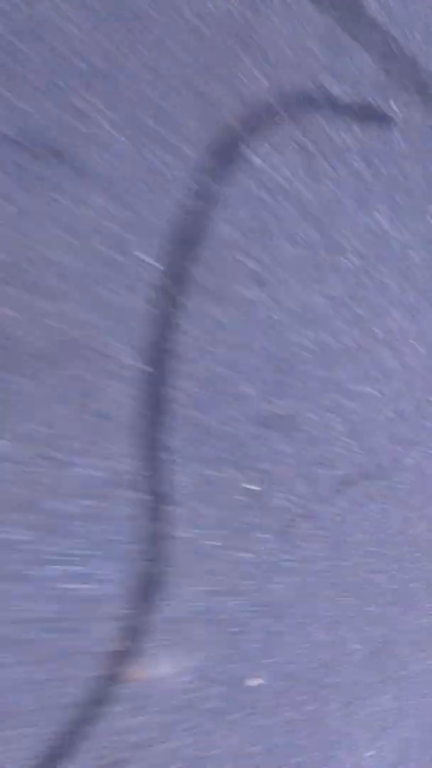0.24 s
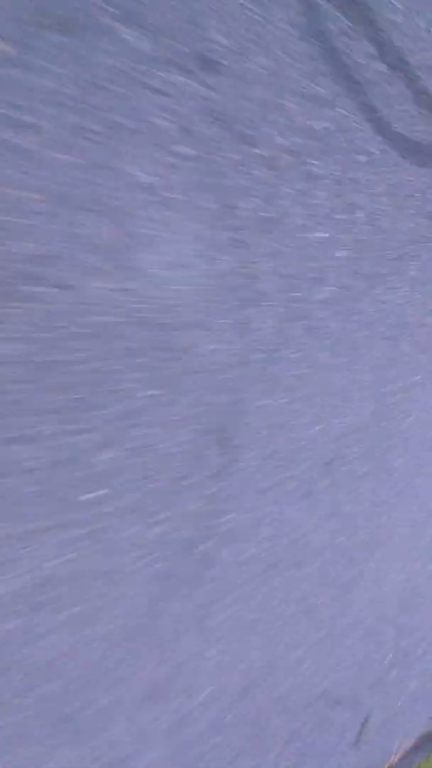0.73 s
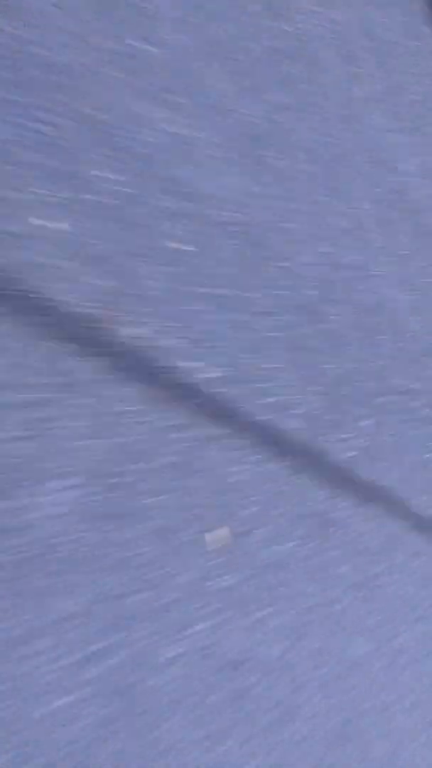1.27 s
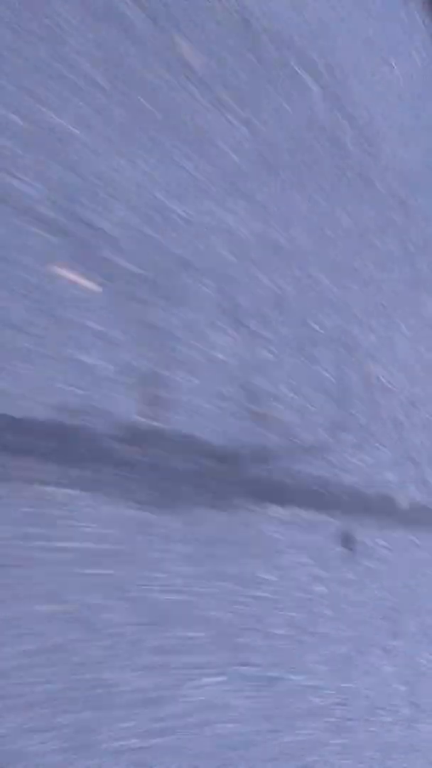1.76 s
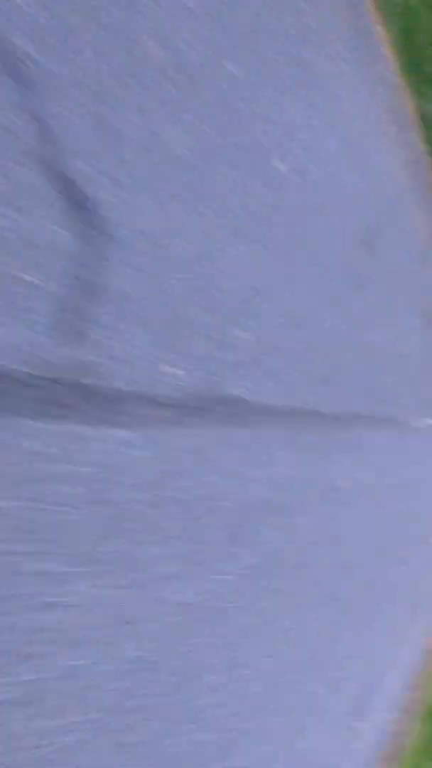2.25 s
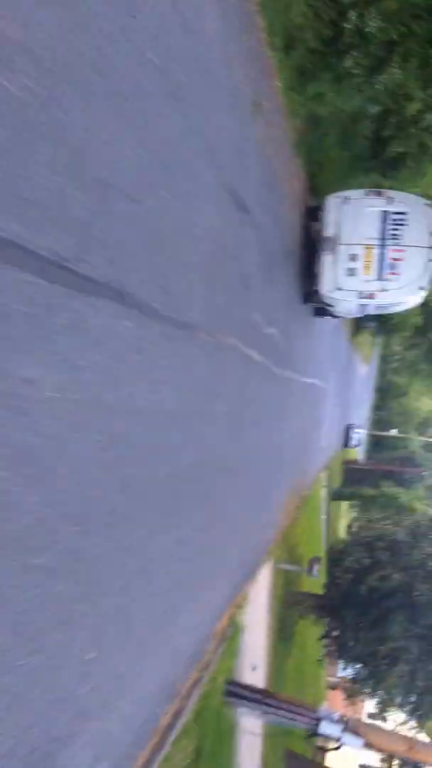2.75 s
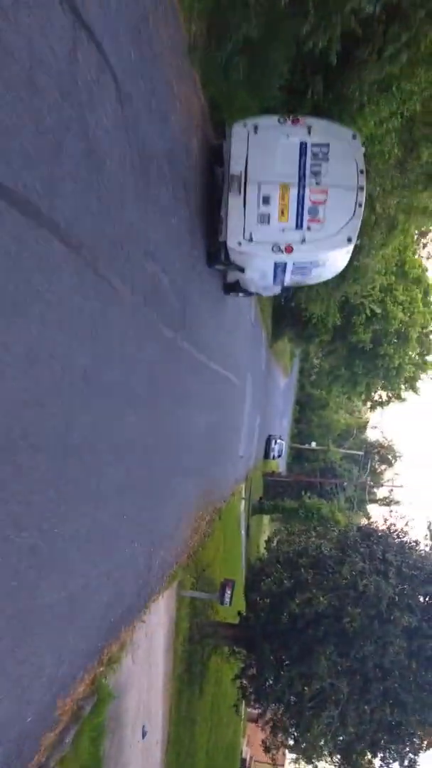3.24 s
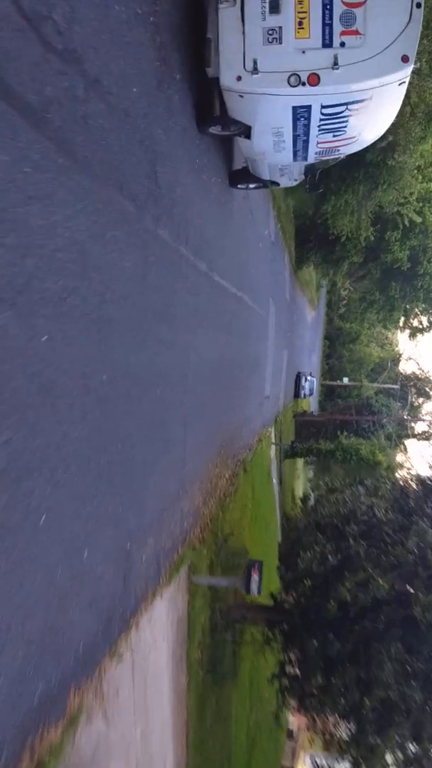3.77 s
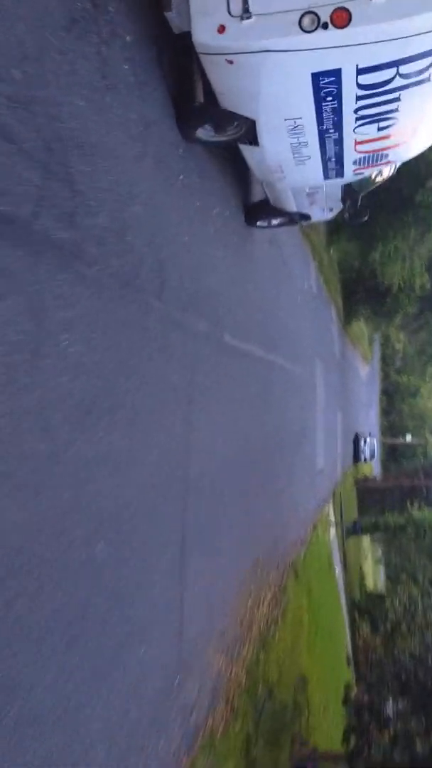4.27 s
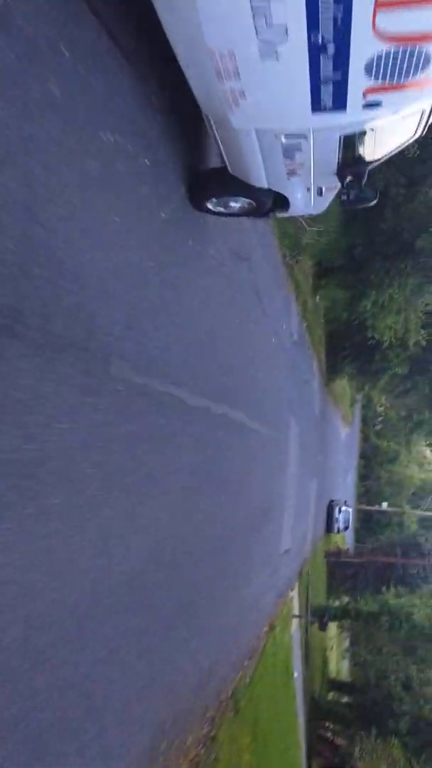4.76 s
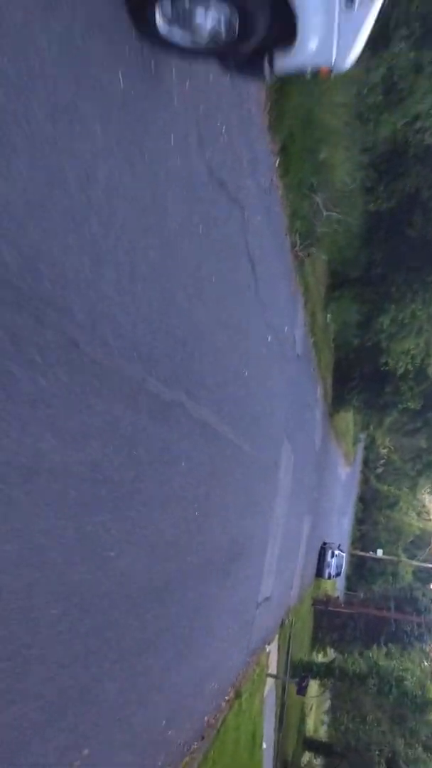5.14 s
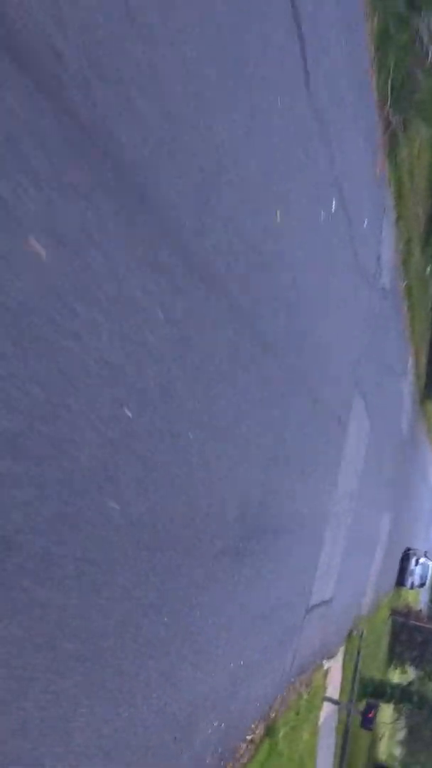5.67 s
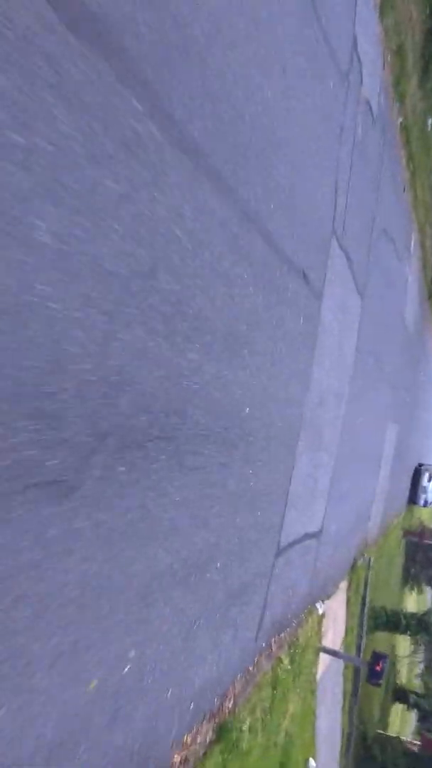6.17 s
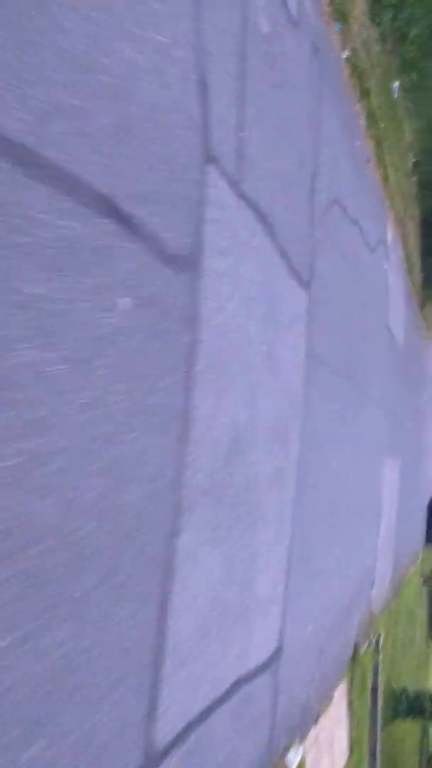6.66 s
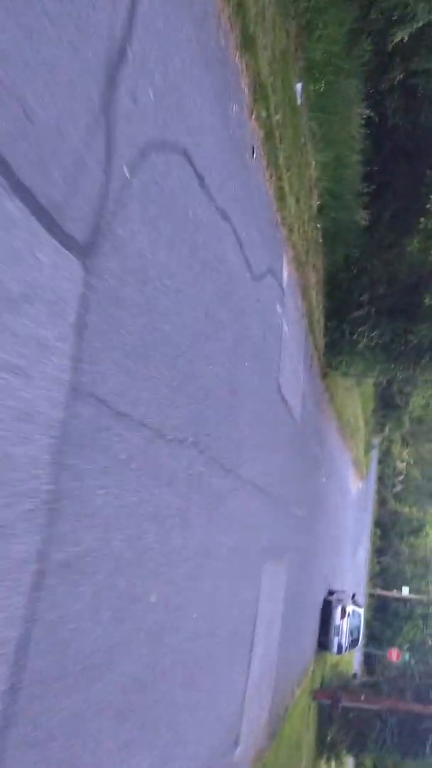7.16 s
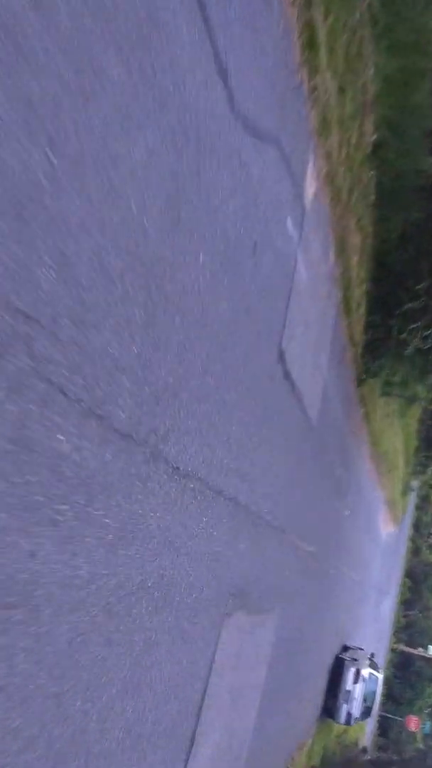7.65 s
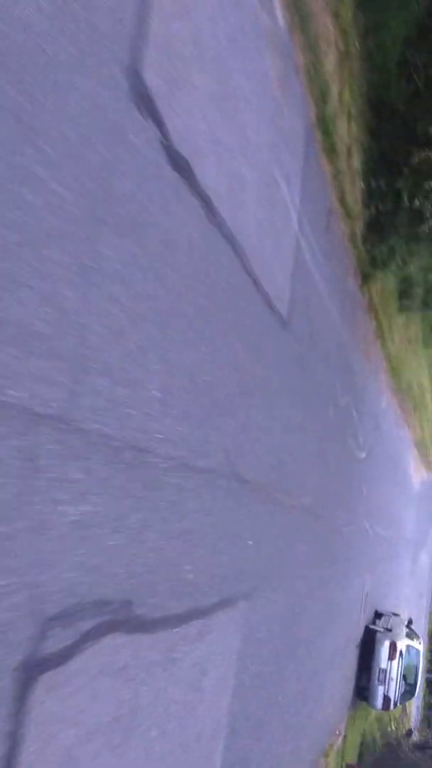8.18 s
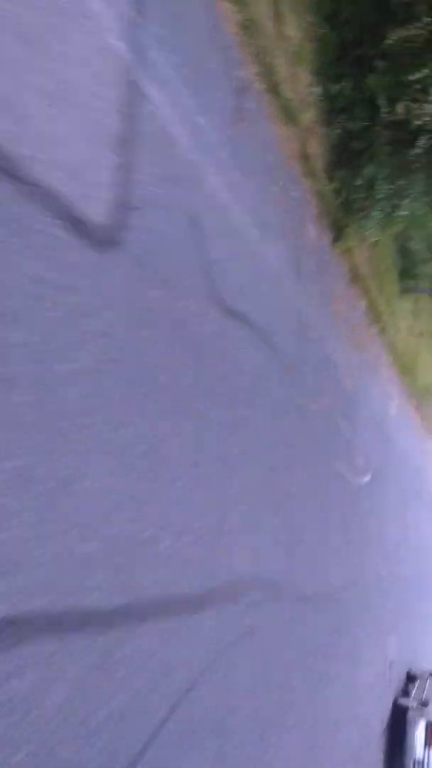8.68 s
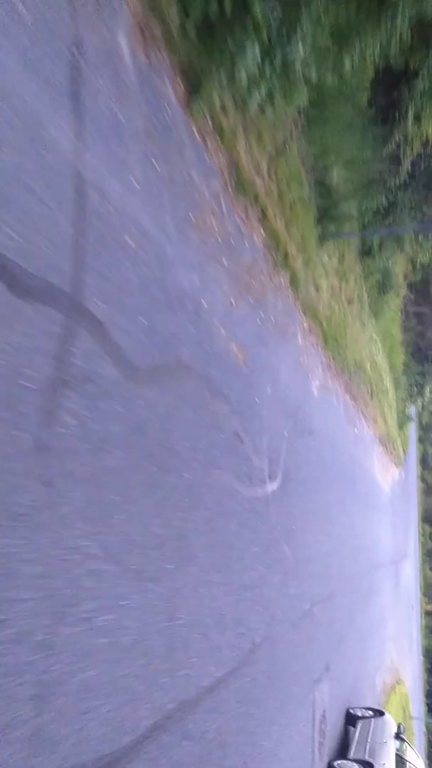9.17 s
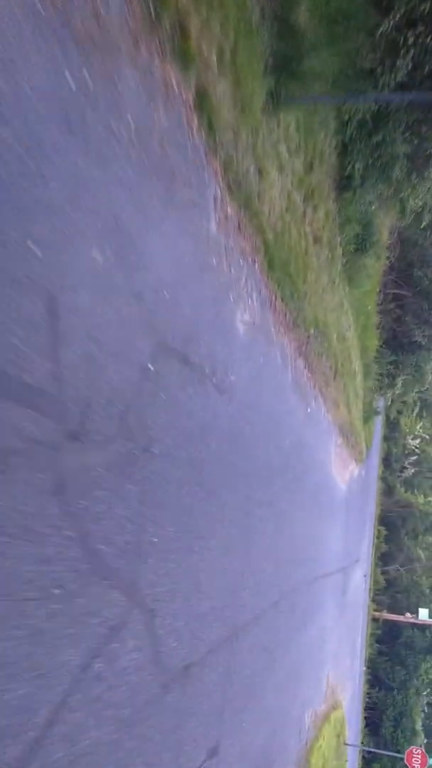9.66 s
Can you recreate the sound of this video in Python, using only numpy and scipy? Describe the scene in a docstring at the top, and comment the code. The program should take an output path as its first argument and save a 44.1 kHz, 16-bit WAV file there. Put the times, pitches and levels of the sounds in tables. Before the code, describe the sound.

Small hard wheels roll fast over rough asphalt throughout, heard close at a handheld camera outdoors: a hollow board rumble, a rougher wheel growl, and thin scraping hiss from grit, all flickering with the surface. From 0 to 2.8 s wind flutters and buffets mainly the right side, building to heavy thumps around 2.3-2.8 s that briefly push the level down; a bump and sharp grit snap land near 2.2 s. From about 2.8 s the wind drops to a light breeze and the rolling is clear, with slight gusts around 4 s. Two quick solid knocks come at 4.7-4.8 s, and the rumble thickens. Another bump at 6.1 s leads into strong blasts from 6.3 to 6.8 s. Several knocks follow at 7.6-7.9 s, then booming gusts with grit snaps at 8.1-8.9 s. It ends in steady rolling with a weaker gust around 9.2-9.7 s.

```python
"""Small hard wheels roll fast over rough asphalt, heard at the two microphone ports of a hand-held camera.
Random clicks stand for stones knocking board, wheels and grit; each layer rings them in its own resonances.
Larger bumps push the board and grit snaps as short noise bursts; headwind buffets mostly the right port.
The camera subtracts each port, late, from the other to widen the stereo; its gain control ducks
at loud peaks and creeps back up."""
import sys
import numpy as np
from scipy import signal
from scipy.fft import rfft, irfft, next_fast_len
from scipy.io import wavfile
from scipy.ndimage import uniform_filter1d

SR = 44100
rng = np.random.default_rng(int(sys.argv[2]) if len(sys.argv) > 2 else 0)


def master(y):
    """Save y as 16-bit WAV."""
    cut = np.clip(np.atleast_2d(y).T, -1, 1)
    pcm = np.round(cut * 32767)  # scale
    wavfile.write(sys.argv[1], SR, pcm.astype(np.int16))


N = 437472
T_S = np.arange(N) / SR
SIZE = next_fast_len(N + SR // 2)  # FFT length, with room for tails
HZ = np.maximum(np.arange(SIZE // 2 + 1) * SR / SIZE, 1e-3)  # FFT bins, kept above zero


def undb(db):
    """Gain of a level in dB."""
    return 10 ** (np.asarray(db) / 20)


def unit(x):
    """Scale to rms 1."""
    return x / np.sqrt(np.mean(x ** 2))


def curves(table):
    """Columns of a table joined by straight lines in time."""
    start_s, *columns = np.transpose(table)
    return [np.interp(T_S, start_s, column) for column in columns]


def ring(x, modes, low_hz, high_hz, order=2):
    """Side-by-side resonances of alternating sign, with skirts below low_hz and above high_hz."""
    gain = 0
    for k, (pitch_hz, width_hz, level_db) in enumerate(modes):
        detune = (HZ / pitch_hz - pitch_hz / HZ) * pitch_hz / width_hz
        gain = gain + (-1) ** k * undb(level_db) / (1 + 1j * detune)
    low_skirt = 1 / (1 + low_hz / (1j * HZ))
    high_skirt = 1 / (1 + 1j * HZ / high_hz)
    spectrum = rfft(x, SIZE) * gain * (low_skirt * high_skirt) ** order
    return irfft(spectrum, SIZE)[..., :N]


def walk(rate_hz):
    """Random levels held 1 / rate_hz and slewed, without slow drift; rms 1."""
    hold = int(SR / rate_hz)
    steps = np.repeat(rng.standard_normal(N // hold + 1), hold)
    slewed = uniform_filter1d(uniform_filter1d(steps, hold), hold // 2)[:N]
    return unit(slewed - uniform_filter1d(slewed, SR // 7))


def knocks(rate_hz, spread_db):
    """Clicks at random moments, either sign, a few much larger than the rest; rms 1."""
    struck = rng.random(N) < rate_hz / SR
    boost_db = spread_db * np.minimum(rng.exponential(size=N), 5)
    return unit(struck * rng.standard_normal(N) * undb(boost_db))


def rung_knocks(rate_hz, spread_db, modes, low_hz, high_hz):
    """Two independent streams of knocks ringing the same resonances, each at rms 1."""
    return [unit(ring(knocks(rate_hz, spread_db), modes, low_hz, high_hz)) for _ in range(2)]


def place(table, gains):
    """One click for each row of an event table."""
    clicks = np.zeros(N)
    np.add.at(clicks, (np.array(table)[:, 0] * SR).astype(int), gains)
    return clicks


def at_ports(near, far, likeness, pan_db):
    """Two ports sharing a sound in part; negative likeness pushes one as it pulls the other; pan_db is left/right."""
    right = likeness * near + np.sqrt(1 - likeness ** 2) * far
    return np.array([near, right]) * undb(np.array([[pan_db], [-pan_db]]) / 2)


# resonances of light wind: pitch_hz, width_hz, level_db (relative)
BREEZE_MODES = [(67, 102, 3), (158, 134, -2), (510, 284, -30)]


def breeze():
    """Small eddies burst at each port alone; one slow level moves both."""
    return np.array(rung_knocks(900, 1.2, BREEZE_MODES, 23, 2400)) * undb(-28.5 + 1.8 * walk(9))


# gusts on the right port: start_s, end_s (both at half height), level_db
GUST_SPANS = [(0, .14, -10.5), (.14, 0.757, -17.5), (.39, 0.466, -14), (0.764, 1.31, -12.5),
              (1.31, 1.52, -9.5), (1.52, 1.92, -15.5), (1.933, 2.527, -7.5), (2.53, 2.812, -5),
              (3.45, 4.55, -25), (3.78, 4.198, -17.5), (5.8, 6.253, -25.5), (6.293, 6.767, -5),
              (6.77, 7.05, -21), (7.445, 8.1, -21), (8.114, 8.216, -8.5), (8.265, 8.871, -4.5),
              (9.2, 9.698, -20)]
GUST_RISE_S, GUST_FALL_S = 0.032, 0.024


def gust_envelope():
    """Each gust swells, holds and drops away; overlapping gusts add."""
    total = np.zeros(N)
    for start_s, end_s, level_db in GUST_SPANS:
        rise = (T_S - start_s) / GUST_RISE_S + .5
        fall = (end_s - T_S) / GUST_FALL_S + .5
        total += undb(level_db) * np.clip(np.minimum(rise, fall), 0, 1)
    return total


# resonances of gusty wind: pitch_hz, width_hz, level_db (relative)
EDDY_MODES = [(56.3, 44.5, -1.5), (130, 143, -0.5), (246, 270.4, -6), (647, 330, -19), (1230, 280, -36.5)]


def gusts():
    """Flickering eddies burst at one port under the gust envelope."""
    eddies = knocks(900, 1.58) * undb(2.44 * walk(20))
    return unit(ring(eddies, EDDY_MODES, 36.3, 1700)) * gust_envelope()


# strongest eddies: start_s, level_db (pulse centre), port (0 left, 1 right)
THUMP_EVENTS = [(.018, 0.5, 1), (.137, -2.5, 1), (.409, -6, 1), (0.427, -11.5, 0), (.507, 1, 1),
                (.811, 0.5, 1), (1.114, -1.5, 1), (1.248, 6, 1), (1.557, 1, 1), (1.633, -1, 1),
                (1.704, -3, 1), (1.793, 4, 1), (2.017, 0, 1), (2.186, 3, 1), (2.308, 7.5, 1), (2.447, 5, 1),
                (2.502, 13, 1), (2.565, 5, 1), (2.698, 7, 1), (2.797, 6, 1), (6.185, 1.5, 1), (6.336, 9, 1),
                (6.467, 9.5, 1), (6.586, 14, 1), (6.74, 8, 1), (7.981, 5.5, 0), (8.122, -3, 0),
                (8.189, 9, 1), (8.353, 8, 1), (8.443, 5, 1), (8.548, 7, 1), (8.579, 12.5, 1)]


def thumps():
    """Suction, push, suction (or the reverse) as a strong eddy sweeps past one port."""
    _, level_db, port = np.transpose(THUMP_EVENTS)
    strength = np.sign(rng.standard_normal(len(port))) * undb(level_db)
    u = np.arange(-700, 701) / SR / 0.0017  # time in pulse widths of 1.7 ms
    pulse = (1 - u ** 2 + 0.33 * u) * np.exp(-u ** 2 / 2)
    blows = [place(THUMP_EVENTS, strength * (port == p)) for p in range(2)]
    return np.array([signal.fftconvolve(blow, pulse, "same") for blow in blows])


def wind():
    """Breeze on both ports, gusts on the right, strong thumps on top."""
    ports = breeze()
    ports[1] += gusts()
    return ports + thumps()


# grit snapping under a wheel: start_s, peak_db, pitch_hz, width_octaves, decay_s (to 1/e)
SNAP_EVENTS = [(.423, -30, 7400, 1.5, .002), (1.140, -30, 2700, 1.2, .001), (2.095, -28, 6500, 2.2, .002),
               (2.174, -20, 1500, 3.4, .009), (2.982, -28, 4500, 1.3, .0008), (4.733, -13, 1100, 2., .001),
               (7.281, -23, 2300, 1.4, .001), (8.152, -19, 7500, 2.2, .001), (8.472, -22, 2000, 1.3, .0012),
               (8.527, -22, 1500, 1.8, .002), (8.579, -20, 1300, 1.3, .0012)]


def snaps():
    """Each snap is a decaying burst of noise, filtered to a band around its own pitch."""
    size = 1500
    out = np.zeros((2, N + size))
    for start_s, peak_db, pitch_hz, width_octaves, decay_s in SNAP_EVENTS:
        half_band = 2 ** (width_octaves / 2)
        edges_hz = [pitch_hz / half_band, min(pitch_hz * half_band, 20000)]
        band = signal.butter(3, edges_hz, "bandpass", fs=SR)
        burst = rng.standard_normal((2, size)) * np.exp(-np.arange(size) / SR / decay_s)
        snap = signal.lfilter(*band, burst)
        start = int(start_s * SR)
        out[:, start:start + size] += snap * undb(peak_db) / np.abs(snap).max()
    return out[:, :N]


# larger stones and seams knocking the board: start_s, peak_db
BUMP_EVENTS = [(.775, -8), (2.172, 0), (4.087, -9), (4.298, -10.5), (4.730, 0), (4.800, 2), (6.095, -1),
               (7.654, -7.5), (7.746, -2.5), (7.924, -1), (9.601, -11)]
# board resonances, for bumps and rumble: pitch_hz, width_hz, level_db (relative)
BOARD_MODES = [(232.6, 61.4, -6), (347, 89, -7), (462.4, 84, -1.5), (618.3, 57, 1), (723, 49.4, -7)]


def bumps():
    """A bigger stone gives the board a soft push; both ports hear it alike."""
    shape = ring(np.hanning(40), BOARD_MODES, 400, 1000)[:3000]
    strength = undb(np.array(BUMP_EVENTS)[:, 1]) / np.abs(shape).max()
    return signal.fftconvolve(place(BUMP_EVENTS, strength), shape)[:N]


def board_rumble(level_db):
    """Road texture knocks the board into its low resonances, nearly alike at both ports."""
    board = rung_knocks(4004, 0.5, BOARD_MODES, 69, 646)
    return undb(level_db) * at_ports(*board, 0.99, -0.48)


# wheel resonances: pitch_hz, width_hz, level_db (relative)
WHEEL_MODES = [(738, 63.4, 10), (908, 101, 1.5), (1005, 181, -2.5), (1392, 130, -5), (1605, 235, -11)]


def wheel_growl(level_db):
    """Stones knock the hard wheels, which ring above the board."""
    wheels = rung_knocks(6070, 2.64, WHEEL_MODES, 650, 1370)
    return undb(level_db) * at_ports(*wheels, 0.97, -0.45)


# whirr resonances: pitch_hz, width_hz, level_db (relative)
WHIRR_MODES = [(1370, 500, 1.5), (1670, 470, 0.5), (2100, 220, 1.5), (2494, 300, -5)]


def whirr(level_db):
    """Dense knocks ring a middle band, partly opposed at the ports and louder on the right."""
    whirring = rung_knocks(6790, 1.2, WHIRR_MODES, 770, 3100)
    return undb(level_db) * at_ports(*whirring, -0.39, -13)


# scrape resonances: pitch_hz, width_hz, level_db (relative)
SCRAPE_MODES = [(2590, 390, 13), (4340, 3300, 0.5)]


def scrape(level_db):
    """Denser knocks ring an upper band, mostly separate at the ports."""
    scraping = rung_knocks(9400, 1.9, SCRAPE_MODES, 1600, 16000)
    return undb(level_db) * at_ports(*scraping, 0.13, -.6)


# grit resonances: pitch_hz, width_hz, level_db (relative)
GRIT_MODES = [(5200, 4200, -4), (7596, 750, 9), (10400, 9800, -4.5), (17000, 3700, -10.5)]


def grit_hiss(level_db):
    """The densest knocks blur into hiss, almost separate at the ports."""
    left, right = rung_knocks(11460, 2.4, GRIT_MODES, 850, 37000)
    right = unit(signal.lfilter([1, .35], 1, right))  # the right port is shaded from the finest hiss
    return undb(level_db) * at_ports(left, right, 0.089, 1.6)


# rolling: start_s, rumble_db, hiss_db, growl_db (re rumble), scrape_db (re hiss)
ROAD_LEVELS = [(0, -18, -45.5, -16.5, -6), (.21, -23, -49.5, -10, -4.5), (.4, -20, -46.5, -10.5, -5),
               (.77, -20, -45, -5.5, -3), (1.1, -20, -50, -10, -2), (1.45, -19.5, -48.5, -17, -7),
               (2.1, -17.5, -44.5, -8.5, -9), (2.6, -16.5, -50.5, -12.5, -12), (3.0, -19, -50.5, -13, -10),
               (3.6, -18, -50, -8, -3), (4.3, -19, -50.5, -13.5, -4), (4.55, -14, -46, -13.5, -9),
               (4.85, -14.5, -50, -14, -9), (5.3, -15.5, -48, -17.5, -8.5), (6.1, -17, -46.5, -7.5, -3),
               (6.6, -13.5, -48, -14, -5), (7.4, -13.5, -47.5, -15, -8.5), (7.9, -14, -46, -12.5, -3.5),
               (8.5, -14, -48, -10, -0.5), (8.8, -17, -48, -15.5, -6), (9.3, -16.5, -49, -13.5, -3),
               (9.92, -15.5, -50.5, -14.5, -7)]
WHIRR_DB = 1.5  # re hiss


def rolling():
    """The road texture knocks board and wheels; coarse patches make all layers flicker together."""
    rumble_db, hiss_db, growl_db, scrape_db = curves(ROAD_LEVELS)
    patch, grain = walk(34), walk(70)
    flicker_db = 0.68 * patch + 0.48 * grain
    return (board_rumble(rumble_db + .5 * patch)
            + wheel_growl(rumble_db + growl_db + 0.98 * patch)
            + whirr(hiss_db + WHIRR_DB + 0.72 * flicker_db)
            + scrape(hiss_db + scrape_db + 0.67 * flicker_db)
            + grit_hiss(hiss_db + flicker_db))


def scene():
    """Sound pressure at the left and right port."""
    return rolling() + bumps() + snaps() + wind()


# share of each port taken from the other: pitch_hz, share (0-1)
CROSS_SHARE = [(100, .83), (1000, .84), (2300, .76), (4660, .95), (6960, .93), (9300, .62), (16000, .56)]
CROSS_LAG_SAMPLES = 19


def widen(x):
    """Subtract each port, late and weighted by frequency, from the other."""
    share = np.clip(np.interp(HZ, *np.transpose(CROSS_SHARE)), 0, 1)
    lag = np.exp(-2j * np.pi * HZ * CROSS_LAG_SAMPLES / SR)
    return x - irfft(rfft(x[::-1], SIZE) * share * lag, SIZE)[:, :N]


CEILING_DB, RECOVER_DB_PER_S, SMOOTH_S = -1.5, 10, 0.0045


def gain_control(x):
    """A peak over the ceiling quickly pulls both channels down; the gain climbs back at a steady rate."""
    room_db = np.minimum(CEILING_DB - 20 * np.log10(np.abs(x).max(axis=0) + 1e-9), 0)
    climb_db = RECOVER_DB_PER_S * T_S
    gain_db = climb_db + np.minimum.accumulate(room_db - climb_db)
    return x * undb(uniform_filter1d(gain_db, int(SMOOTH_S * SR)))


TOP_HZ = 15740


def record(dry):
    """Rumble cut, stereo widening, gain control, rounded peaks, top cut."""
    low_cut = signal.butter(4, 44, "highpass", fs=SR, output="sos")
    top_cut = signal.ellip(14, .3, 80, TOP_HZ, fs=SR, output="sos")
    wide = gain_control(widen(signal.sosfilt(low_cut, dry)))
    soft = wide / (1 + np.abs(wide) ** 14) ** (1 / 14)
    return signal.sosfilt(top_cut, soft)


dry = scene()
out = record(dry)
master(out)
```